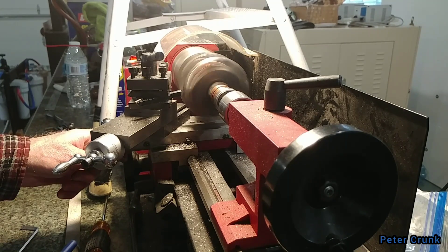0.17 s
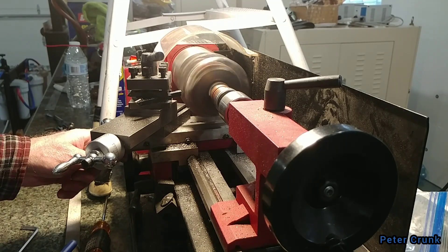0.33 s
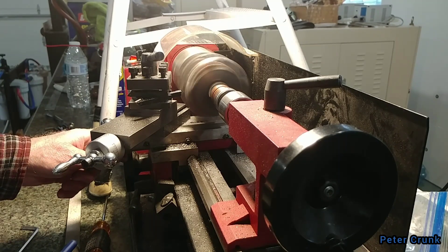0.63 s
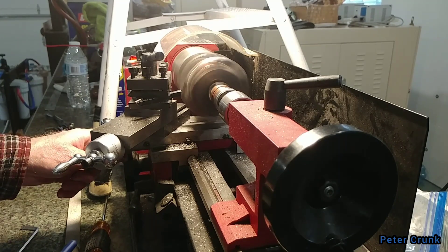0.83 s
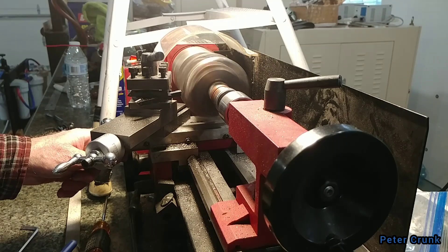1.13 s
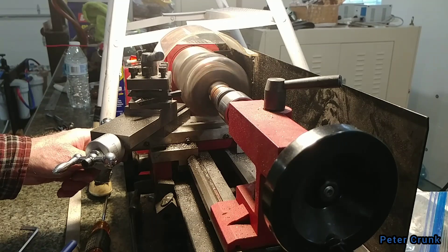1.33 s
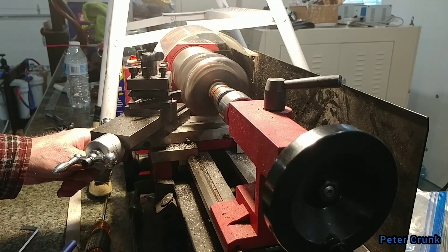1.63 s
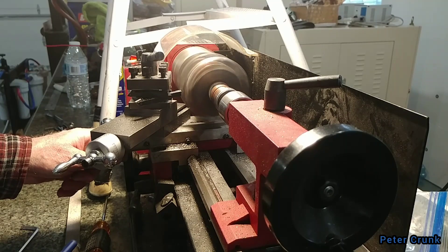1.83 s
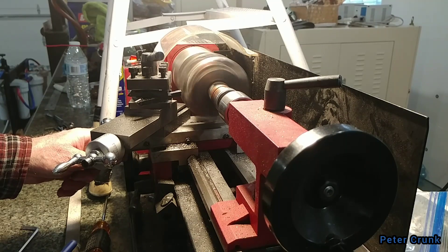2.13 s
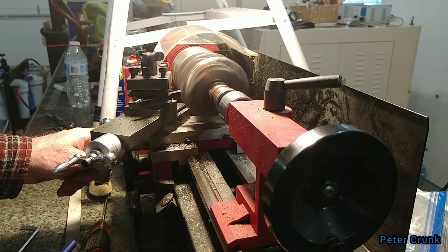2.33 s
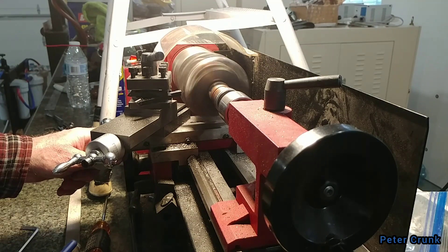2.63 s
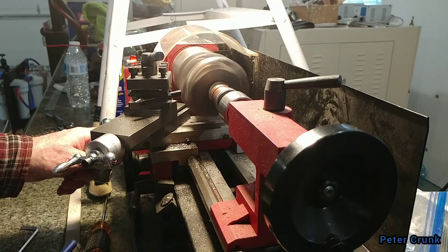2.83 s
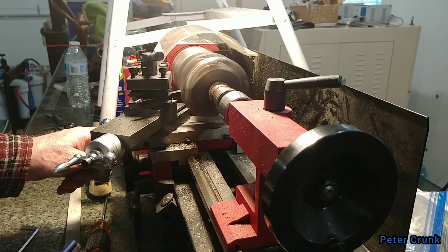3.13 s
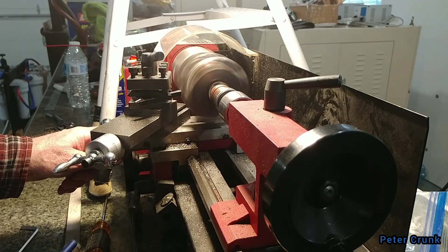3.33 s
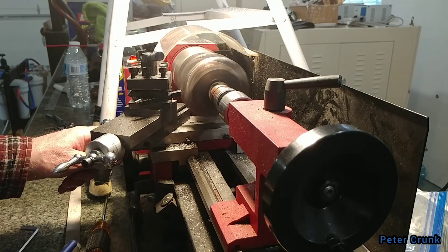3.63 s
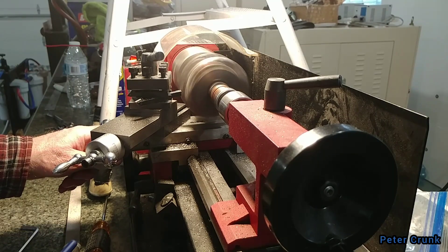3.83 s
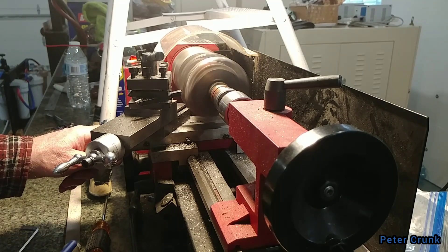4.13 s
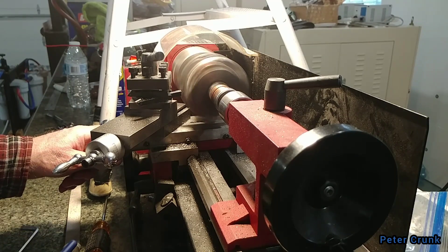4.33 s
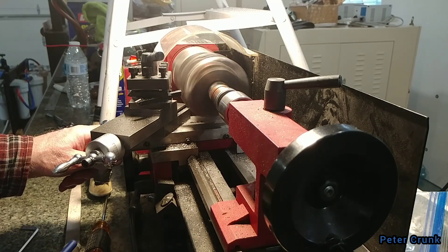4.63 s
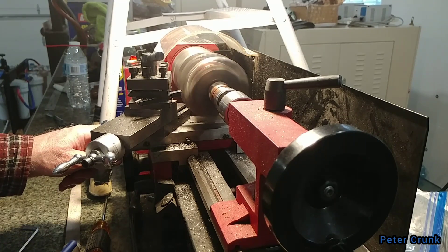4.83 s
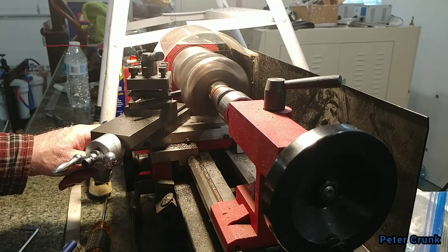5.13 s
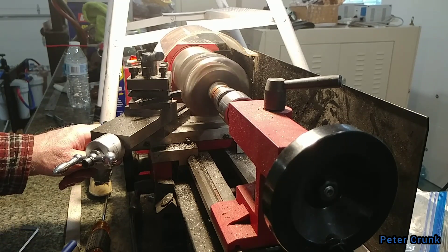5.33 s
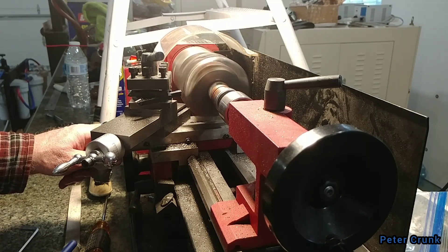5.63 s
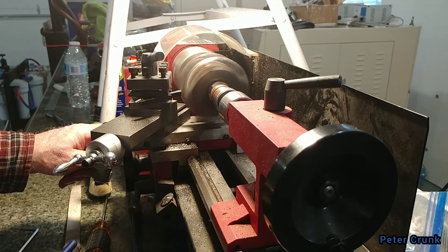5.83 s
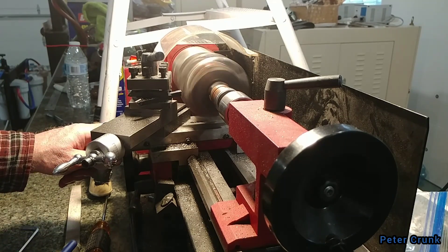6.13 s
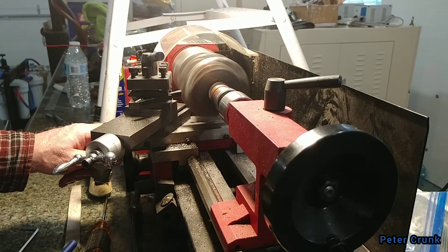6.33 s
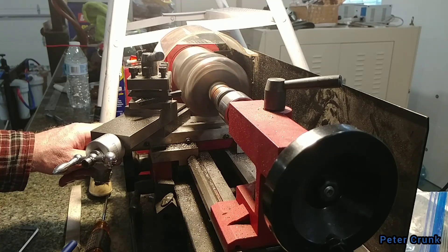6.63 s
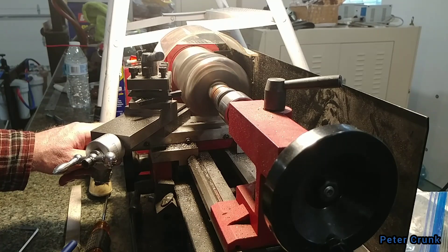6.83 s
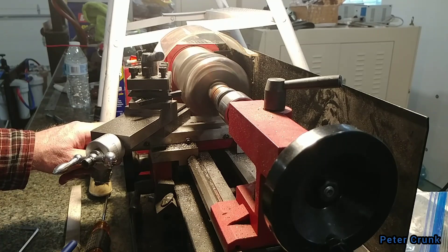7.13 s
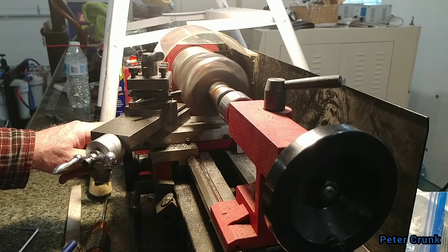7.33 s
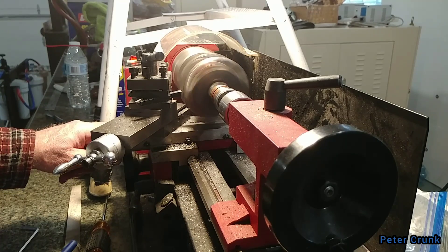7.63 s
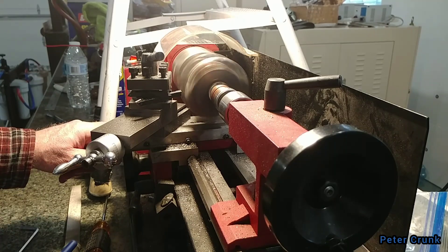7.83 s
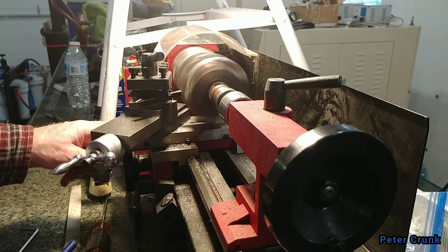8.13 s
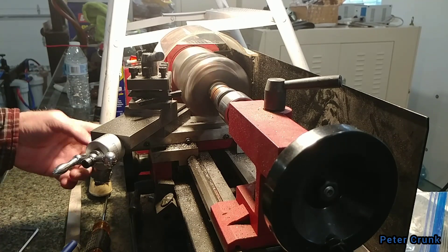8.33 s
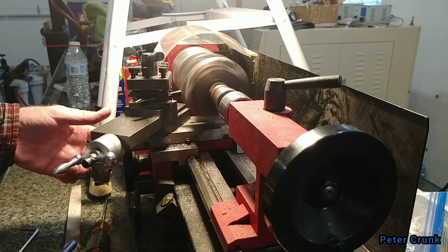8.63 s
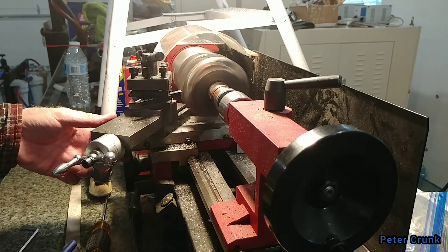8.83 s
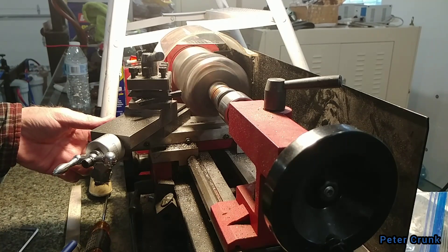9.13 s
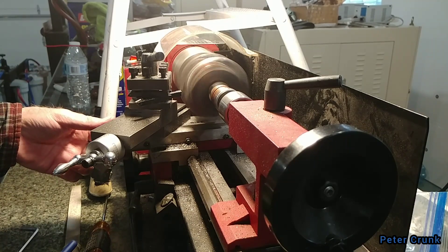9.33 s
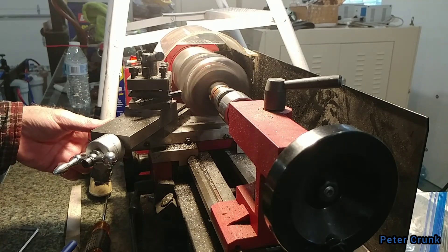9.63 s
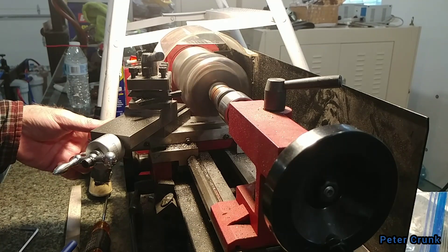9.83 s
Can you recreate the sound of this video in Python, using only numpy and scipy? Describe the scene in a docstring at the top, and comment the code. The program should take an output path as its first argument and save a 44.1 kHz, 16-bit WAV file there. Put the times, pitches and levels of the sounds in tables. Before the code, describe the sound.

A benchtop metal lathe runs steadily close by, its throbbing hum and gear whine overlaid with rapid, piercing squeaks fluttering on every turn.

```python
"""In a small workshop, a benchtop metal lathe runs close by at about 23 turns a second.
Four drive knocks a turn sum as harmonics of the spindle; gear and motor tones are modulated sines.
Bearings, rattle, loose parts and dry friction are filtered noise, mostly in step with the spindle's angle.
Three high spots rub and squeak on every turn as short tone and noise bursts, with a rasp now and then.
The steel sings thinly in swells, as noise through narrow resonances."""
import sys
import numpy as np
from scipy import signal
from scipy.fft import rfft, irfft, next_fast_len
from scipy.io import wavfile
from scipy.ndimage import uniform_filter1d

SR = 44100
rng = np.random.default_rng(int(sys.argv[2]) if len(sys.argv) > 2 else 0)


def int16_out(signal):
    """Quantize to a 16-bit WAV file."""
    q = np.round(np.clip(np.atleast_2d(signal).T, -1, 1) * 32767)
    wavfile.write(sys.argv[1], SR, q.astype(np.int16))


N = 440118
TURN_HZ = 23.337  # mean spindle speed

# load on the drive, as the level of its hum: (time [s], level [dB])
DRIVE_LOAD = [(0.0, -17), (0.44, -18.5), (3.08, -16), (3.39, -17), (3.72, -14.5), (4.03, -16),
              (8.23, -15.5), (9.15, -19), (9.9, -15.5), (9.98, -15.5)]
# high spots on the spinning metal: (place on the turn [turns], chance of barely touching [0-1])
RUB_SPOTS = [(.262, 0), (.436, .14), (.943, .02)]


def amp(db):
    """Level definition: decibels to amplitude gain."""
    return 10 ** (np.asarray(db) / 20)


def unit(x):
    """Power normalization: scale to rms 1."""
    return x / np.sqrt(np.mean(x ** 2) + 1e-20)


def along(points, hz):
    """Logarithmic frequency scale: interpolate (frequency [Hz], value) points on it."""
    f, v = np.transpose(points)
    return np.interp(np.log(hz + 1), np.log(f + 1), v)


def curves(rows):
    """Linear interpolation in time: one curve for each column after the time."""
    s, *cols = np.transpose(rows)
    return [np.interp(np.arange(N) / SR, s, c) for c in cols]


def wobble(rate):
    """Band-limited random modulation: a smooth curve through rate knots a second."""
    knots = rng.standard_normal(int(N * rate / SR) + 4)
    fine = signal.resample_poly(knots, 10, 1)
    return np.interp(np.arange(N) * rate / SR * 10, np.arange(len(fine)), fine)


def filtered(x, response):
    """Linear filtering: multiply the spectrum by a response of frequency."""
    m = next_fast_len(N + SR // 2)
    hz = np.fft.rfftfreq(m, 1 / SR)
    return irfft(rfft(x, m) * response(hz), m)[..., :N]


def resonances(modes, hz):
    """Modal superposition: peaks (frequency [Hz], half width at half gain [Hz], level [dB])."""
    return sum(amp(db) / (1 + ((hz - centre) / width) ** 2) for centre, width, db in modes)


def noise(colour):
    """Interchannel coherence: mid and side noises mix to stereo noise of rms 1, left channel leading."""
    # left-right likeness: (frequency [Hz], correlation before the delay [0-1])
    likeness = [(40, 0.26), (350, 1), (800, 0.36), (1500, 0.72), (2500, 0.48), (5000, 0.16), (15000, 0.2)]
    left_lead_s = .0001  # the left microphone is nearer

    def response(hz):
        angle = np.arccos(np.clip(along(likeness, hz), -1, 1)) / 2
        return colour(hz) * np.array([np.cos(angle), np.sin(angle)])

    mid, side = filtered(rng.standard_normal((2, N)), response)
    return unit(np.array([mid + side, np.roll(mid - side, round(left_lead_s * SR))]))


def spindle():
    """Angular kinematics: turns completed, slightly ahead of or behind the mean speed."""
    # departure from the mean speed: (time [s], lead [turns])
    lead = [(0.0, -0.016), (0.7, -0.029), (1.3, -0.054), (1.8, -0.058), (2.8, -0.043), (4.0, -0.033),
            (5.0, -0.039), (7.6, -0.069), (8.0, -0.053), (8.6, -0.042), (9.2, -0.017), (9.98, -0.004)]
    return TURN_HZ * np.arange(N) / SR + curves(lead)[0]


def load():
    """Load on the drive, in dB above an ordinary load; it governs bearing level and squeak brightness."""
    usual_db = -16.5  # the hum under an ordinary load
    return curves(DRIVE_LOAD)[0] - usual_db


def drive(turns, level_db=0, shake_db=0.38, left_db=1.55, left_lead=0.0041):
    """Fourier series of periodic forcing: four uneven knocks a turn ring the housing, so the hum throbs."""
    # the drive's knocks: (place on the turn [turns], level [dB])
    blows = [(.08, 0), (.275, -4), (.516, -5), (.839, -6.5)]
    # the housing's answer: (multiple of the turn rate, relative level [dB])
    housing = [(1, -56.7), (2, -51.3), (3, -58.9), (4, -57.2), (5, -54.3), (6, -41.9), (7, -37.8),
               (8, -39.6), (9, -57.5), (10, -56.9), (11, -53.8), (12, -32.0), (13, -35.9), (14, -33.0),
               (15, -27.4), (16, -18.4), (17, -47.8), (18, -27.1), (19, -31.6), (20, -26.8), (21, -34.4),
               (22, -39.9)]
    place = np.linspace(0, 1, 2048)
    ring = 0
    for multiple, db in housing:
        push = sum(amp(size_db) * np.exp(2j * np.pi * multiple * (place - at)) for at, size_db in blows)
        ring = ring + amp(db) * np.cos(np.angle(push))  # knocks set the timing, the housing the size
    ring = unit(ring)
    pair = []
    for side in (1, -1):  # left, right
        shifted = (turns + side * left_lead / 2) % 1  # left_lead in turns
        pair.append(amp(side * left_db / 2) * np.interp(shifted, place, ring))
    return np.array(pair) * amp(curves(DRIVE_LOAD)[0] + level_db + shake_db * wobble(22))


def gears(turns, level_db=-.5, flutter_db=0.93, backlash=0.29):
    """Phase-locked tooth-mesh tones: play in the teeth makes each flutter in level and phase."""
    # gear lines: (multiple of the turn rate, relative level [dB], left-right [dB], left lead [rad])
    gear_lines = [(23, -41.2, 11.6, -0.1), (24, -35.7, 4.1, 2.3), (25, -36.5, 9.2, -2.0),
                  (28, -31.8, 2.0, 0.1), (29, -43.1, 0.9, -1.3), (30, -38.2, -4.2, 0.3),
                  (31, -40.2, -0.7, -1.4), (32, -38.7, 2.1, -1.3), (34, -36.8, -3.4, -1.3),
                  (35, -42.7, -3.3, 0.7), (36, -36.7, -8.1, 0.1), (40, -40.3, 0.2, 0.3),
                  (41, -39.7, -3.7, 0.2), (53, -40.6, -1.1, 0.6), (60, -43.3, 5.2, 0.3),
                  (61, -39.9, -3.8, -0.9), (63, -32.6, 0.2, -0.1), (64, -41.0, -2.8, -0.6),
                  (65, -43.5, -3.1, 0.5), (78, -42.4, 0.4, 0.1), (79, -38.2, -1.4, -0.1),
                  (81, -41.2, -7.5, -2.0), (83, -43.7, -7.5, 1.3), (84, -36.2, -12.2, 0.3),
                  (85, -36.9, -8.8, 0.2), (88, -42.6, -1.8, -0.2)]
    out = np.zeros((2, N))
    sides = np.array([[.5], [-.5]])
    for multiple, db, left_db, lead in gear_lines:
        phase = 2 * np.pi * (multiple * turns + rng.random()) + backlash * wobble(9)
        size = amp(db + flutter_db * wobble(6)) * amp(sides * left_db)
        out += size * np.sin(phase + sides * lead)
    return np.sqrt(2) * amp(level_db) * out


def motor(level_db=0, flutter_db=2, drift=0.56):
    """Beating of tones unrelated to the spindle: motor and belt waver and beat against the gears."""
    # motor and belt: (frequency [Hz], level before flutter [dB rms])
    motor_tones = [(44.7, -46.5), (83.7, -50), (131, -50.5), (167.5, -49), (249.5, -49), (759, -40),
                   (782, -41.5), (804.5, -31.5), (1213, -47.5), (1843, -45)]
    t = np.arange(N) / SR
    total = 0
    for hz, db in motor_tones:
        phase = 2 * np.pi * (hz * t + rng.random()) + drift * wobble(5)  # drift in radians
        total = total + amp(db + flutter_db * wobble(10)) * np.sin(phase)
    return np.sqrt(2) * amp(level_db) * total


def worn_teeth(turns):
    """Cyclic repetition: the same roughness of the teeth comes round on every turn."""
    count = int(SR / TURN_HZ)
    shared, own = rng.standard_normal(count), rng.standard_normal((2, count))
    place = np.arange(count) / count
    pair = np.array([np.interp(turns % 1, place, shared + side / 2) for side in own])
    # (frequency [Hz], level [dB])
    colour = [(500, -40), (850, -3), (1200, 0), (2000, -2), (2200, -9), (3200, -10), (5000, -22)]
    return unit(filtered(pair, lambda hz: amp(along(colour, hz))))


def bearings(turns, rush_db=0, teeth_db=-7, frame_db=-4, surge_db=0.95, heavy_place=0.35,
             grain_db=3.0, rumble_db=-41):
    """Amplitude modulation: rolling noise, tooth rattle and frame modes surge at the turn's heavy part."""
    # bearing rush, then low rumble: (frequency [Hz], relative level [dB])
    rush_colour = [(150, -36), (290, 3), (600, -0.5), (1100, -2), (2000, -2), (2250, -2.5), (3200, -3),
                   (4200, -8), (6200, -10), (7200, -22), (9000, -3.5), (10600, -10.5), (12600, -19),
                   (15700, -31)]
    rumble_colour = [(10, -15), (28, -5), (42, -5), (62, -8), (82, -3), (105, -3), (150, 5.5), (210, 0),
                     (400, -32), (900, -70)]
    # frame and motor resonances: (frequency [Hz], half width [Hz], relative level [dB])
    frame_modes = [(762, 65, -1.5), (810, 15, -3.5), (1468, 24, -5.5), (1616, 36, -3), (1809, 30, -1.5),
                   (2020, 130, -17.5)]
    usual_db, growth = -22.5, 0.49  # gain at an ordinary load; dB more for each dB of load
    surge = surge_db * np.cos(2 * np.pi * (turns - heavy_place))
    rush = amp(rush_db + 1.4 * wobble(25)) * noise(lambda hz: amp(along(rush_colour, hz)))
    frame = amp(frame_db + 1.1 * wobble(10)) * noise(lambda hz: resonances(frame_modes, hz))
    rattle = amp(grain_db * wobble(160)) * (frame + amp(teeth_db) * worn_teeth(turns))
    rumble = amp(rumble_db) * noise(lambda hz: amp(along(rumble_colour, hz)))
    return amp(usual_db + growth * load() + surge) * (rush + rattle) + rumble


def squeaks(turns, level_db=0, miss_db=6, scrape_db=-22, linger=1.17):
    """Friction-excited modes: each high spot swells fast and fades more slowly as it wipes past."""
    # level of each of the three high spots: (time [s], first [dB], second [dB], third [dB])
    rub_levels = [(0.0, -7.5, -6, -5), (0.8, -9, -8, -4.5), (1.7, -7.5, -7, -3.5), (3.0, -12, -3.5, -5.5),
                  (4.3, -9, -5, -4), (6.4, -6, -9.5, -6.3), (8.3, -7, -5.5, -6.5), (9.98, -8.5, -6.5, -9)]
    # modes a rub excites: (frequency [Hz], level [dB], delay [s], half length [s],
    # phase between the microphones [rad])
    squeak_modes = [(1580, -20.5, .0008, 0.00064, .3), (1876, -16, .001, 0.001, 0.37),
                    (7890, -12.5, -.0008, 0.0007, 1.6), (8390, -7.5, -.0001, .001, 0.53),
                    (8752, -2, -.0002, 0.0012, 0.54), (9150, -4, -.0009, 0.00051, 1.47),
                    (9780, -4.5, -.0006, 0.001, 1.4), (11400, -18, -.0005, 0.0012, 2.05),
                    (12930, -22, 0, 0.0012, 2.1)]
    scatter_db, detune = 1., .005  # one rub is much like the next; detune is a fraction of frequency
    slip, stray = .8, .4  # random phase of each mode, and of each microphone's path [rad]
    bite_db_per_khz = 1.4  # brightening for each dB of load
    out = np.zeros((2, N + SR))
    half = SR // 130
    t = np.arange(-half, half) / SR
    sides = np.array([.5, -.5])[:, None, None]
    bite = bite_db_per_khz * load()

    def swell(delay, width):
        """Asymmetric Gaussian envelope, longer after its peak."""
        spread = width * np.where(t > delay, linger, 1 / linger)
        return np.exp(-.5 * ((t - delay) / spread) ** 2)

    for (place, miss), rub_db in zip(RUB_SPOTS, curves(rub_levels)):
        passes = np.arange(int(N / SR * TURN_HZ) + 1) + place
        at = np.interp(passes, turns, np.arange(N)).astype(int)  # sample of each pass
        at = at[at < N - 1]
        shape = (len(at), 1)
        scrape_size = amp(scrape_db + 2 * rng.standard_normal(shape))
        bursts = scrape_size * swell(-0.00072, 0.0032) * rng.standard_normal((2, len(at), len(t)))
        start = rng.random(shape)
        for hz, db, delay, width, apart in squeak_modes:
            tuned_hz = hz * (1 + detune * rng.standard_normal(shape))
            phase = 2 * np.pi * (tuned_hz * (t - delay) + start) + slip * rng.standard_normal(shape)
            # each microphone hears its own mix of paths
            paths = sides * apart + stray * rng.standard_normal((2, *shape))
            tilt_db = bite[at, None] * np.clip((hz - 8730) / 1000, -.5, 1)
            size = amp(db + tilt_db + rng.standard_normal(shape))
            bursts += size * swell(delay, width) * np.sin(phase + paths)
        barely = rng.random(shape) < miss
        size_db = rub_db[at, None] + scatter_db * rng.standard_normal(shape) - miss_db * barely
        out[:, at[:, None] + np.arange(len(t))] += amp(size_db + level_db) * bursts
    return out[:, half:half + N]


def scrapes(level_db=-3, length_s=0.011):
    """Transient broadband friction: now and then the contact catches and gives a short rasp."""
    # harsher catches of the metal: (time [s], relative peak [dB])
    catches = [(0.172, -19), (0.688, -18), (1.244, -16), (2.403, -18), (2.572, -22), (2.745, -19),
               (3.43, -12), (3.773, -17), (4.824, -20), (5.399, -17)]
    t = np.arange(N) / SR
    envelope = sum(amp(db) * np.exp(-.5 * ((t - s) / length_s) ** 2) for s, db in catches)
    # (frequency [Hz], level [dB])
    colour = [(6500, -30), (7700, -2), (9600, 0), (10800, -6), (12200, -7), (15000, -20)]
    return amp(level_db) * envelope * noise(lambda hz: amp(along(colour, hz)))


def singing(level_db=2):
    """Self-sustained vibration: light friction keeps narrow modes simmering; they swell, hold and fade."""
    # the steel's narrow modes: (frequency [Hz], half width [Hz], relative level [dB])
    steel_modes = [(6810, 70, -12), (7890, 42, 0), (8010, 50, -8), (12170, 90, -10), (13035, 35, -20)]
    # the steel breaks into song: (time of the peak [s], relative peak [dB], hold [s])
    song = [(0.128, -23, .02), (.45, -18.5, 0.052), (.61, -21, .05), (1.27, -24, .03), (2.313, -21, .02),
            (2.64, -23, .02), (2.91, -21, .02), (3.532, -15.5, 0.055), (3.607, -17.5, .02),
            (3.916, -22, .02), (4.17, -24, .02), (4.54, -19.5, .03), (5.12, -23, .05), (5.64, -21, .02),
            (5.923, -17.5, .03), (6.05, -22, .02), (6.466, -23, .06), (6.98, -21, .02), (7.83, -18, .03),
            (8.17, -21, .02), (8.537, -22, .03), (9.285, -22, .05), (9.63, -19, .02)]
    rise_s, fall_s = .025, 0.025  # time constants of a swell
    simmer_db, swing_db, swing_rate = -29.5, 3.5, 12  # between swells: level, random swing, knots a second
    t = np.arange(N) / SR
    ring = noise(lambda hz: resonances(steel_modes, hz))
    power = np.abs(uniform_filter1d(np.mean(ring ** 2, axis=0), SR // 20))
    even = ring / np.sqrt(power + 1e-6)  # self-sustained, so steady in size
    size = amp(simmer_db + swing_db * wobble(swing_rate))
    for s, db, hold in song:
        before = np.maximum(s - hold / 2 - t, 0)
        after = np.maximum(t - s - hold / 2, 0)
        size = np.maximum(size, amp(db) * np.exp(-before / rise_s - after / fall_s))
    return amp(level_db) * size * even


def chatter(turns, level_db=-33, rate=45, size_db=3.0, ring_s=0.0037, bunching=0.5):
    """Random impacts with exponential decay: loose parts tick, strongest near the first high spot."""
    count = int(rate * N / SR)  # rate in ticks a second
    sizes = amp(size_db * np.minimum(rng.exponential(size=count), 3.5))
    ticks = np.bincount(rng.integers(0, N, count), sizes, N)
    shaken = ticks * (1 + bunching * np.cos(2 * np.pi * (turns - RUB_SPOTS[0][0])))
    energy = signal.lfilter([1], [1, -np.exp(-2 / (ring_s * SR))], shaken ** 2)
    # (frequency [Hz], level [dB])
    colour = [(700, -18), (1400, 0.5), (2000, 7.0), (3200, -17), (4500, -19), (8000, -35)]
    return amp(level_db) * unit(np.sqrt(energy) * noise(lambda hz: amp(along(colour, hz))))


def fizz(turns, swing_db=3.5, swing_rate=30, press_db=7, press_turns=.06):
    """Dry-friction noise: it grows steadily, and is harder while a high spot presses past."""
    # modes under the fizz: (frequency [Hz], half width [Hz], relative level [dB])
    fizz_modes = [(11200, 200, -7), (12720, 110, 0), (14300, 600, -13), (15350, 350, -13)]
    start_db, growth_db_per_s = -48, 1.54
    pressing = 0
    for place, _ in RUB_SPOTS:
        away = (turns - place + .5) % 1 - .5  # turns from the high spot
        pressing = pressing + np.exp(-.5 * (away / press_turns) ** 2)
    level_db = start_db + growth_db_per_s * np.arange(N) / SR
    level_db = level_db + swing_db * wobble(swing_rate) + press_db * (pressing - pressing.mean())
    return amp(level_db) * noise(lambda hz: resonances(fizz_modes, hz))


def shop(x):
    """Diffuse reverberation: convolution with noise decaying by 60 dB in a time set by frequency."""
    # reverberation time: (frequency [Hz], t60 [s])
    t60 = [(200, 0.23), (3000, 0.059), (9000, 0.21), (15000, 0.021)]
    hz, t, z = signal.stft(rng.standard_normal((2, SR // 3)), SR, nperseg=256)
    decay = amp(-60 * t / along(t60, hz)[:, None])
    tail = signal.istft(z * decay, SR, nperseg=256)[1]
    return signal.fftconvolve(x, tail / np.linalg.norm(tail[0]), axes=1)[:, :N]


def scene():
    """Superposition of sources: nearly everything follows the spindle's angle."""
    room_db = -12.5  # close by, so the squeaks stay apart
    turns = spindle()
    rubs = squeaks(turns) + scrapes()
    machine = drive(turns) + gears(turns) + motor() + bearings(turns) + chatter(turns)
    return machine + rubs + amp(room_db) * shop(rubs) + singing() + fizz(turns)


def record(dry):
    """Soft saturation and band limiting: round off the highest peaks, then drop all above the limit."""
    top_hz = 15750
    rounded = dry / (1 + np.abs(dry) ** 10) ** (1 / 10)
    return filtered(rounded, lambda hz: hz < top_hz)


dry = scene()
out = record(dry)
int16_out(out)
```